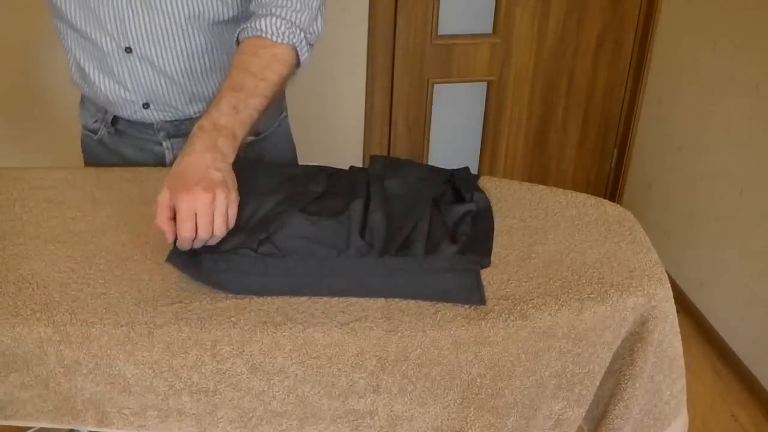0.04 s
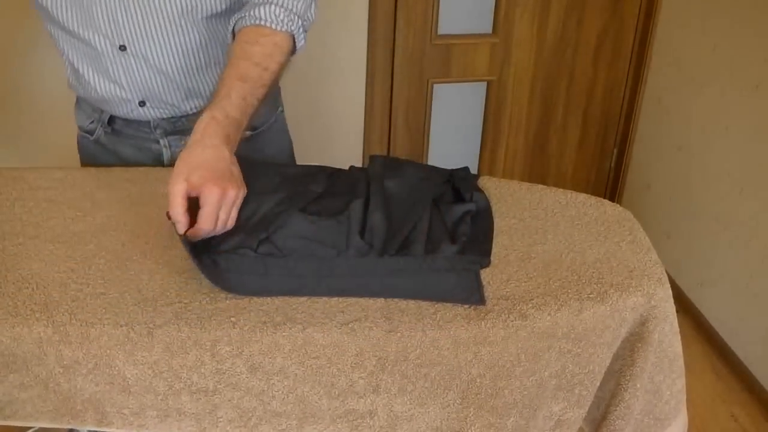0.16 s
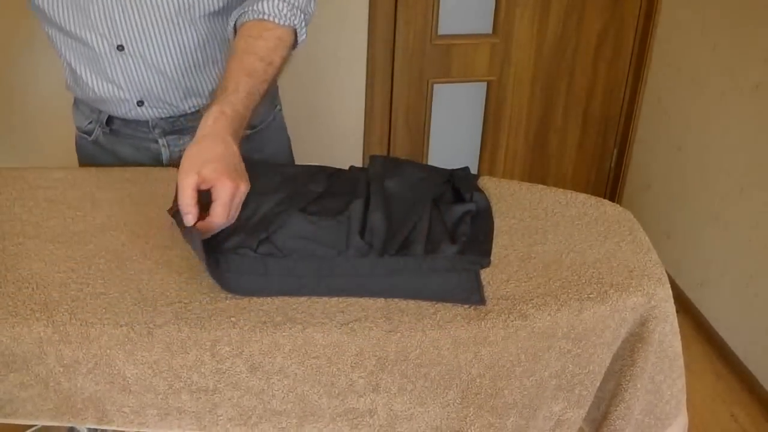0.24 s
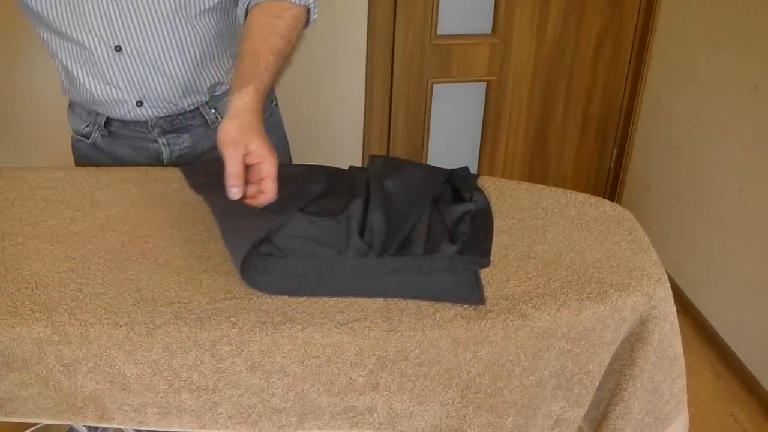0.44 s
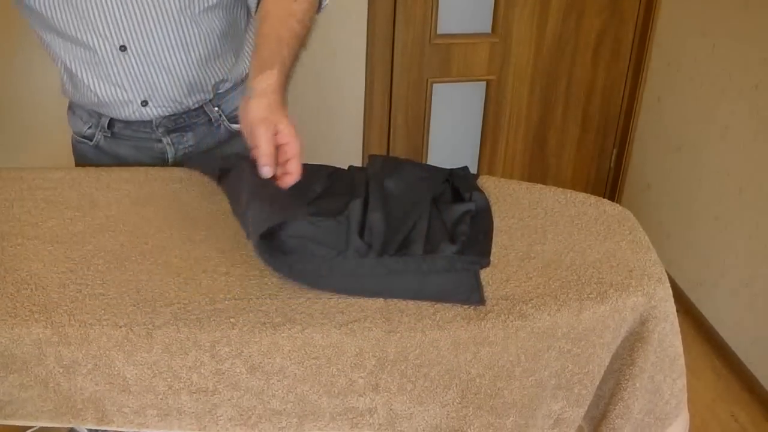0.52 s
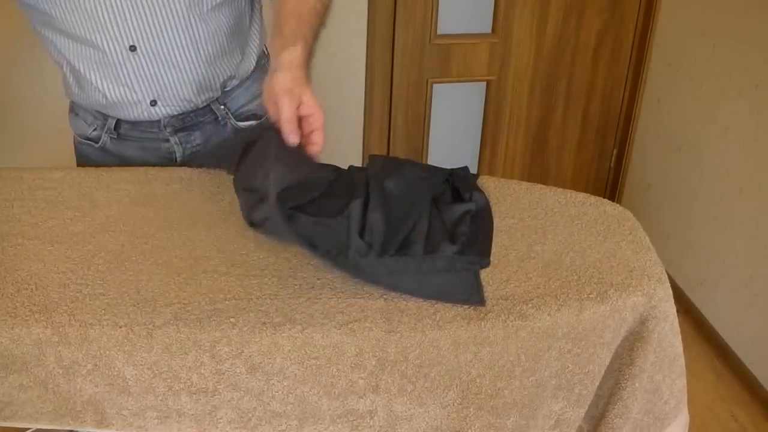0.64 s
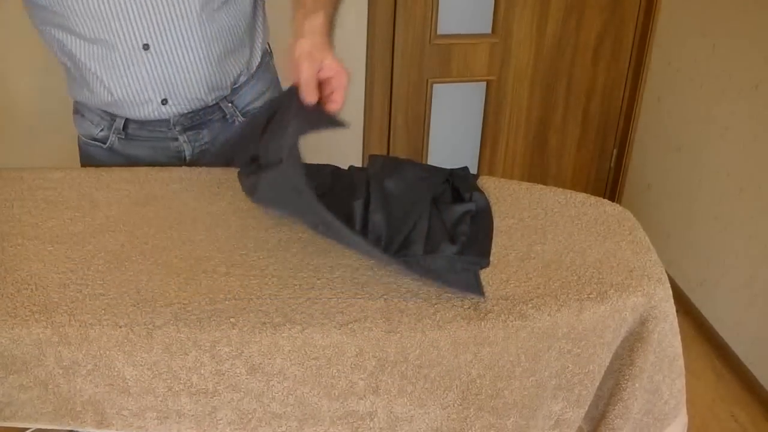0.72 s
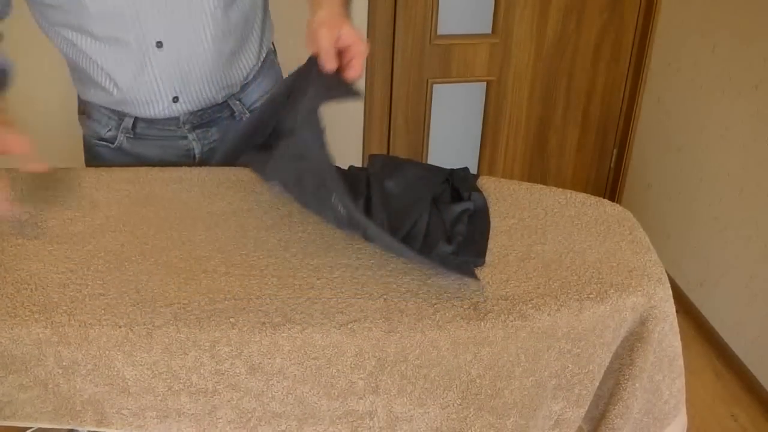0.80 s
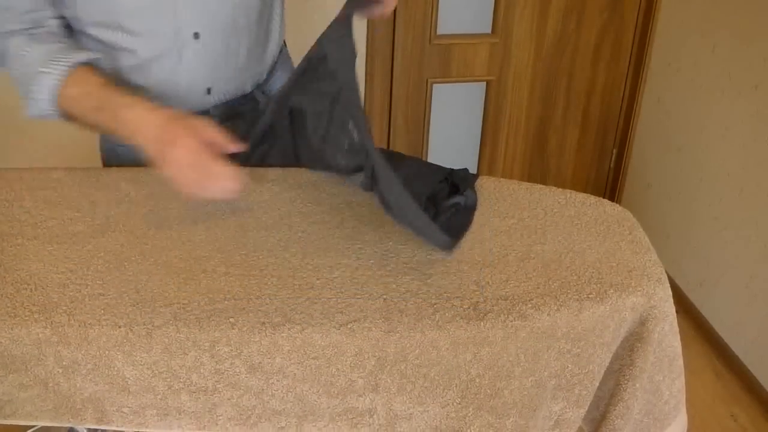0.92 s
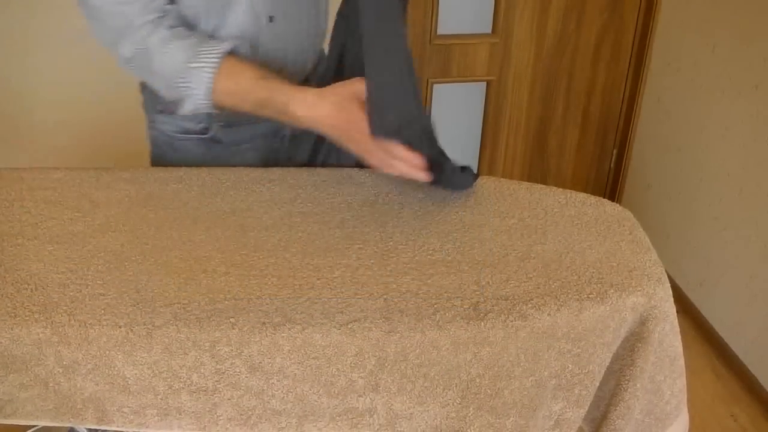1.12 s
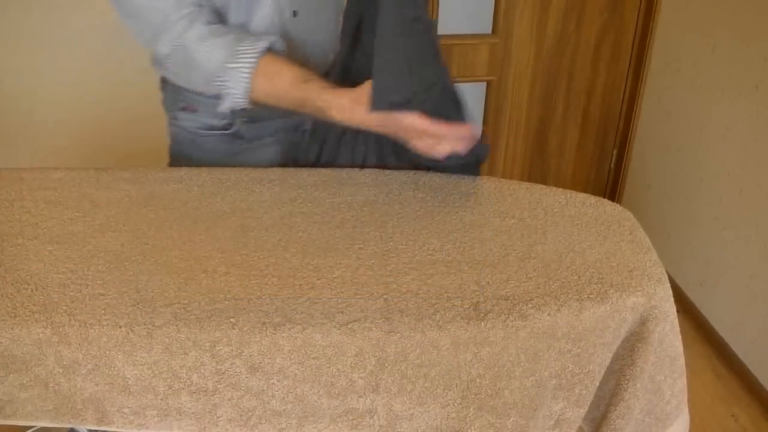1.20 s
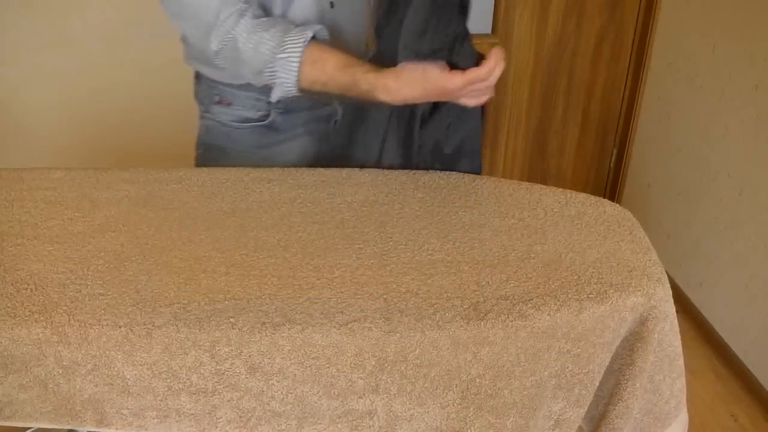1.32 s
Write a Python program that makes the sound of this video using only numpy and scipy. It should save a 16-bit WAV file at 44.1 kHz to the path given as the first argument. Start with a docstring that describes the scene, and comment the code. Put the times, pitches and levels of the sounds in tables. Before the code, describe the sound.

A folding table clacks as a hand's weight comes off it. Dull knocks, ticks and a brief low groan start near 0.15 seconds, peaking in a sharp, ringing cluster around 0.3 seconds, with smaller rattles at 0.4. Trousers then slide and flap softly over the cloth cover, swelling into a swish from about 0.7 to 1.35 seconds. Faint steady noise fills the small, bare room.

```python
"""A folding table clacks, ticks and knocks as trousers are lifted off its cloth cover.
The hand's weight comes off: the padded top thumps and groans, the joints let go, the frame springs
back, and the small, bare room rings on. The fabric slides over the cover and swishes into the air,
above a faint steady room noise."""
import sys
import numpy as np
from scipy import signal
from scipy.fft import rfft, irfft, next_fast_len
from scipy.io import wavfile
from scipy.ndimage import map_coordinates

SR = 44100
rng = np.random.default_rng(int(sys.argv[2]) if len(sys.argv) > 2 else 0)


def master(y):
    """Save y as 16-bit WAV."""
    cut = np.clip(np.atleast_2d(y).T, -1, 1)
    pcm = np.round(cut * 32767)  # scale
    wavfile.write(sys.argv[1], SR, pcm.astype(np.int16))


N = 59535
T = np.arange(N) / SR
LEFT_RIGHT = np.array([[1], [-1]])


def amp(db):
    """Decibels to gain."""
    return 10 ** (np.asarray(db) / 20)


def unit(x):
    """x scaled to rms 1."""
    return x / np.sqrt(np.mean(x ** 2) + 1e-20)


def decay(t_s, t60_s):
    """Gain falling 60 dB per t60_s."""
    return np.exp(-np.log(1000) * t_s / t60_s)


def along(points, hz):
    """(Hz, value) points read on a log frequency axis."""
    points_hz, values = np.transpose(points)
    return np.interp(np.log(hz + 1), np.log(points_hz + 1), values)


def level(points):
    """(s, dB) points as a gain per sample."""
    return amp(np.interp(T, *np.transpose(points)))


def wobble(rate_hz):
    """Smooth random curve, rate_hz knots a second."""
    return map_coordinates(rng.standard_normal(int(N * rate_hz / SR) + 4), [T * rate_hz])


def at(start_s, x):
    """Stereo x delayed to start_s."""
    return np.pad(x, ((0, 0), (max(round(start_s * SR), 0), 0)))[:, :N]


def filtered(x, response):
    """x filtered by response(hz)."""
    size = next_fast_len(N + 8192)
    hz = np.fft.rfftfreq(size, 1 / SR)
    return irfft(rfft(x, size) * response(hz), size)[..., :N]


def noise(colour, tilt_db_per_oct=0, grain=0):
    """Coloured stereo noise of rms 1; grain makes it a crowd of tiny uneven snaps."""
    # Each row: frequency in Hz, left-right correlation.
    correlation = [(50, 0.77), (150, 0.83), (400, 0.86), (1000, 0.92), (2400, 0.97), (4000, 0.81),
                   (6500, 0.7), (10000, 0.39), (15000, 0.22)]

    def mid_side_gain(hz):
        angle = np.arccos(np.clip(along(correlation, hz), -1, 1)) / 2
        gain = amp(along(colour, hz) + tilt_db_per_oct * np.log2(hz + 1))
        return gain * np.array([np.cos(angle), np.sin(angle)])

    white = rng.standard_normal((2, N)) * np.exp(grain * rng.standard_normal(N))
    mid, side = filtered(white, mid_side_gain)
    return unit(np.array([mid + side, mid - side]))


def contact(colour, attack_s, direct_db, direct_s, tilt_db_per_oct=0):
    """A short direct burst and the room's tail, each frequency dying at its own rate."""
    # Each row: frequency in Hz, T60 in seconds.
    room_t60 = [(80, 0.32), (250, 0.26), (1000, 0.49), (2300, 0.41), (5000, 0.44), (12000, 0.33)]
    hz, t_s, spectra = signal.stft(noise(colour, tilt_db_per_oct), SR, nperseg=256)
    spectra = spectra * decay(t_s, along(room_t60, hz)[:, None])
    tail = signal.istft(spectra, SR)[1][:, :N]
    direct_boost = 1 + amp(direct_db) * np.exp(-T / direct_s)
    return tail * (1 - np.exp(-T / attack_s)) * direct_boost


def ring(modes, attack_s):
    """Decaying modes, varied in level and phase at each strike."""
    draws = rng.standard_normal((len(modes), 2))
    tones = sum(amp(db + jitter_db) * decay(T, t60_s) * np.sin(2 * np.pi * (hz * T + phase))
                for (hz, db, t60_s), (jitter_db, phase) in zip(modes, draws))
    return tones * (1 - np.exp(-T / attack_s))


def room_noise():
    """Faint, steady, mostly low noise."""
    # Each row: frequency in Hz, relative level in dB.
    colour = [(20, -21), (40, -18), (65, 2.5), (110, -3.5), (175, -3.5), (260, -11.5), (380, -9.5),
              (600, -13.5), (900, -16), (2200, -15), (5000, -22), (10000, -20), (15500, -33)]
    return amp(-56) * noise(colour)


def fabric():
    """Cloth drags over the cover in tiny slips while its folds flap and the weave hisses."""
    # Each row: time in seconds, level in dB.
    slide_levels = [(0, -63), (.3, -51.5), (.56, -50), (.68, -47), (.87, -46.5), (.95, -47.5),
                    (1.05, -45.5), (1.13, -48.5), (1.24, -49.5), (1.30, -46), (1.35, -45)]
    weave_levels = [(0, -69.5), (.45, -55.5), (.66, -57), (.88, -56), (1.05, -54), (1.23, -58), (1.30, -49),
                    (1.35, -51)]
    fold_levels = [(0, -62.5), (.42, -49), (.62, -61.5), (.72, -52.5), (.82, -60), (.91, -59), (.99, -52),
                   (1.05, -50), (1.15, -53.5), (1.22, -58.5), (1.35, -54.5)]
    # Each row: frequency in Hz, relative level in dB.
    slide_colour = [(100, -31), (500, -4), (1000, -4), (1600, -2.5), (2300, -1.5), (3900, -2.5),
                    (4600, -7.5), (8000, -9), (15500, -15)]
    weave_colour = [(500, -44), (3000, -11), (5000, 3), (7000, 1.5), (10000, -3.5), (13000, -14),
                    (15500, -21)]
    fold_colour = [(30, -18), (100, -11), (220, 3.5), (290, -3), (450, 0), (900, -7), (2000, -14.5),
                   (8000, -46)]
    slips = amp(0.49 * wobble(rate_hz=35.05))
    slide = level(slide_levels) * slips * noise(slide_colour, grain=0.5)
    weave = level(weave_levels) * slips * noise(weave_colour, grain=0.47)
    flaps = amp(1.74 * wobble(rate_hz=29.9))
    folds = level(fold_levels) * flaps * noise(fold_colour, grain=0.85)
    return slide + weave + folds


def top_groan():
    """The top groans in its lowest mode while the hand pushes off."""
    start_s, rise_s, hold_s, pitch_hz = 0.178, 0.029, 0.039, 165.8
    t_s = T - start_s
    rise = np.clip(t_s / rise_s, 0, 1)
    fall = decay(np.maximum(t_s - rise_s - hold_s, 0), t60_s=0.2)
    phase_rad = 2 * np.pi * pitch_hz * T + 0.18 * wobble(rate_hz=30.2)
    return amp(-38) * rise * fall * np.sin(phase_rad)


def top_knocks():
    """The padded top gives dull knocks and soft thumps as the load shifts."""
    # Each row: start in seconds, level in dB.
    knocks = [(.170, -39.5), (.186, -40), (.231, -41), (.407, -38.5)]
    thumps = [(.205, -46), (.283, -42)]
    # Each row: frequency in Hz, relative level in dB.
    knock_colour = [(60, -24), (170, 4.5), (320, -13), (560, -4), (740, 3), (950, -7.5), (1700, -6),
                    (2400, -0.5), (3400, -5.5), (4300, -23), (8000, -26), (16000, -60)]
    thump_colour = [(20, -30), (45, -16), (85, -2.5), (115, -4.5), (170, -11), (270, -18), (360, -8.5),
                    (500, -22), (2000, -64)]
    # Each row: frequency in Hz, relative level in dB, T60 in seconds.
    modes = [(744, -1, 0.45), (985, -11, .4), (2320, -5.5, 0.28)]
    sound = np.zeros((2, N))
    for start_s, db in knocks:
        knock = contact(knock_colour, attack_s=0.0025, direct_db=-11, direct_s=0.008)
        ringing = amp(-2.5) * ring(modes, attack_s=0.002)
        sound += at(start_s, amp(db) * (knock + ringing))
    for start_s, db in thumps:
        thump = contact(thump_colour, attack_s=0.0076, direct_db=3, direct_s=0.024)
        sound += at(start_s, amp(db) * thump)
    return sound


def joint_ticks():
    """Each joint lets go with a dry crack and a bright ringing tick."""
    # Each row: start in seconds, tick level in dB, tilt in dB per octave, crack level in dB.
    ticks = [(0.1499, -49.5, -0.5, -56), (0.207, -45.5, 2.5, -49), (.2540, -28.5, -0.5, -28),
             (0.386, -54, 9, -35)]
    # Each row: frequency in Hz, relative level in dB.
    tick_colour = [(200, -35), (1300, -18.5), (3200, -10), (4000, -3.5), (4500, 3), (5400, -4.5),
                   (6800, -2), (8500, -9), (12000, -14), (16000, -24)]
    crack_colour = [(2000, -30), (5000, -6), (9000, -4), (13000, 1), (16000, -1)]
    # Each row: frequency in Hz, relative level in dB, T60 in seconds.
    modes = [(3980, 1.5, 0.26), (4440, -1, .25), (4580, -0.5, 0.23)]
    crack_decay_s = 0.0016
    sound = np.zeros((2, N))
    for start_s, tick_db, tilt, crack_db in ticks:
        tick = contact(tick_colour, attack_s=0.00047, direct_db=-7.5, direct_s=0.005,
                       tilt_db_per_oct=tilt)
        ringing = amp(-7.5) * ring(modes, attack_s=0.0012)
        crack = amp(crack_db) * np.exp(-T / crack_decay_s) * noise(crack_colour)
        sound += at(start_s, amp(tick_db) * (tick + ringing) + crack)
    return sound


def frame_clacks():
    """The frame springs back with a cluster of ringing clacks, then rattles twice more."""
    # Each row: start in seconds, level in dB.
    clacks = [(0.2754, -27), (.2790, -24), (.290, -28.5), (.358, -37.5), (.412, -45.5)]
    # Each row: frequency in Hz, relative level in dB.
    colour = [(100, -17.5), (280, -29), (700, -15.5), (1200, -19), (1550, -4), (1800, -10), (2150, 5),
              (2700, -5.5), (3300, -4.5), (3950, -5.5), (4600, -35), (7000, -32), (15000, -48)]
    # Each row: frequency in Hz, relative level in dB, T60 in seconds.
    modes = [(374, -12.5, 0.73), (711, -10, .2), (833, -11, 0.25), (987.5, -12, 0.48), (1608, -7.5, .4),
             (1627, -2, 0.25), (1880, -5, 0.18), (2036, -8, 0.46), (2142, -6, 0.82), (2140, -17, 0.33),
             (2320, -10.5, .6), (2439, -4, 0.42), (2636, 1.5, 0.26), (3066, -7, .6), (3930, -6.5, 0.55)]
    sound = np.zeros((2, N))
    for start_s, db in clacks:
        clack = contact(colour, attack_s=0.00096, direct_db=3.5, direct_s=0.0056)
        ringing = amp(-7.5) * ring(modes, attack_s=0.0014)
        sound += at(start_s, amp(db) * (clack + ringing))
    return sound


def scene():
    """Table and fabric slightly to the left, over the room noise."""
    top = amp(0.7 * LEFT_RIGHT) * (top_knocks() + top_groan())
    joints = amp(1.1 * LEFT_RIGHT) * joint_ticks()
    frame = amp(0.37 * LEFT_RIGHT) * frame_clacks()
    cloth = amp(0.28 * LEFT_RIGHT) * fabric()
    return room_noise() + cloth + top + joints + frame


def record(dry):
    """Slight phase offset between the channels and a sharp treble cutoff."""
    # Each row: frequency in Hz, left minus right phase in radians.
    phase_offset = [(60, -.15), (400, -.12), (1000, -0.028), (2500, -0.03), (4500, -0.23), (12000, -.26)]
    cutoff_hz = 15900
    return filtered(dry, lambda hz: (hz < cutoff_hz) * np.exp(0.5j * LEFT_RIGHT * along(phase_offset, hz)))


dry = scene()
out = record(dry)
master(out)
```